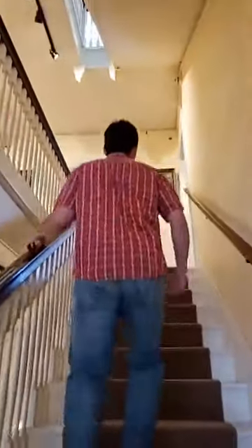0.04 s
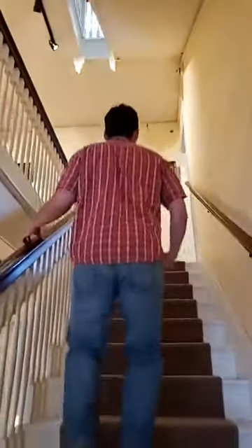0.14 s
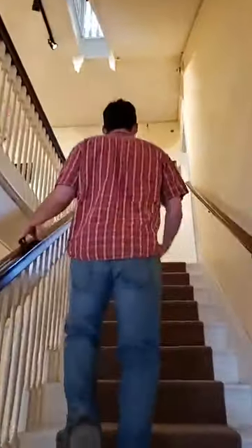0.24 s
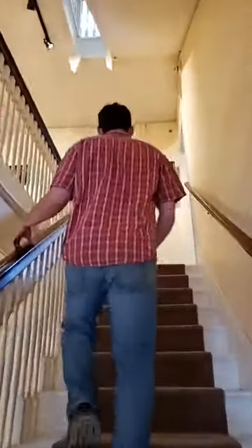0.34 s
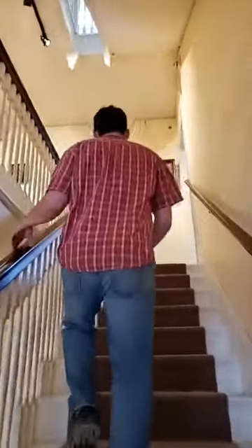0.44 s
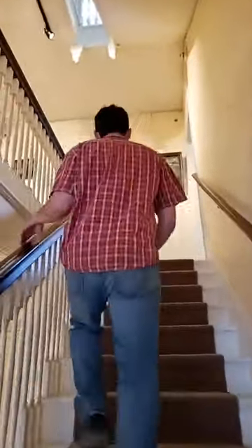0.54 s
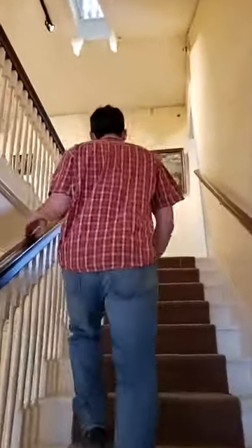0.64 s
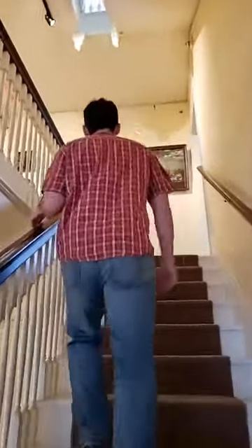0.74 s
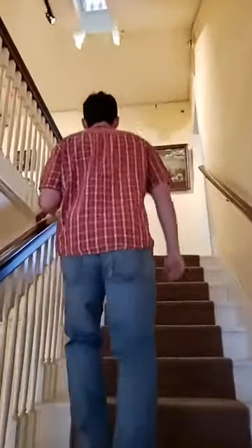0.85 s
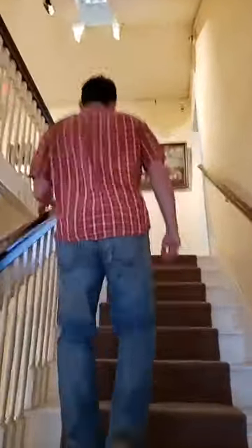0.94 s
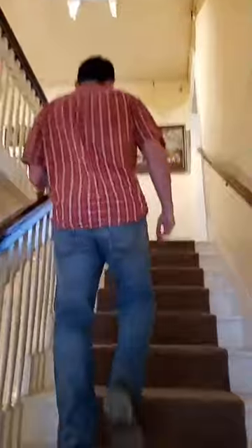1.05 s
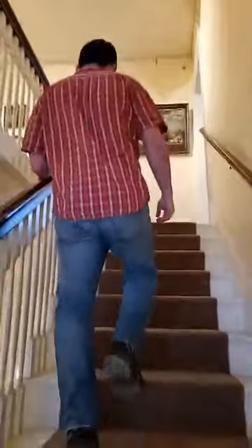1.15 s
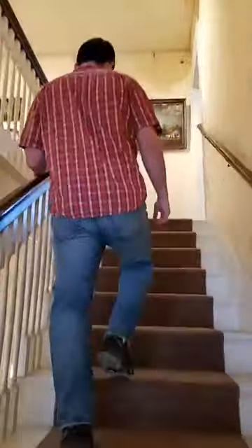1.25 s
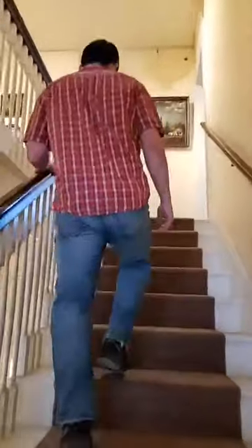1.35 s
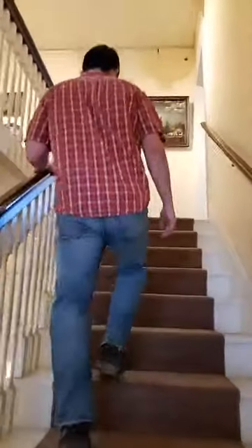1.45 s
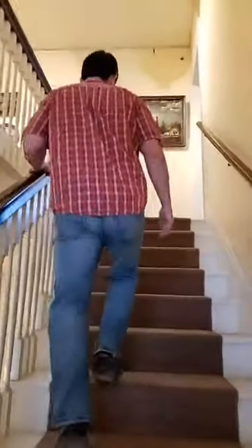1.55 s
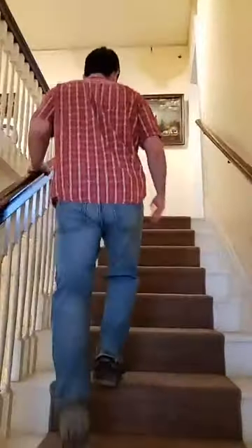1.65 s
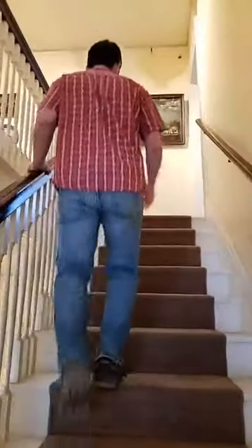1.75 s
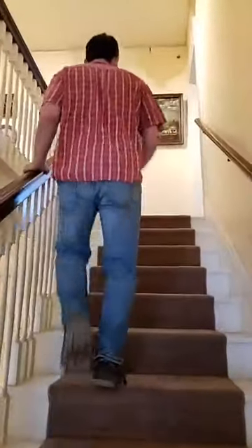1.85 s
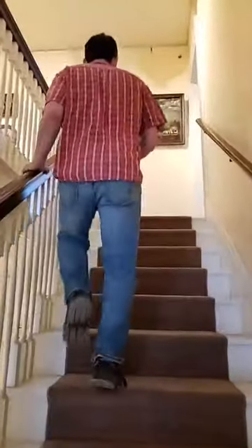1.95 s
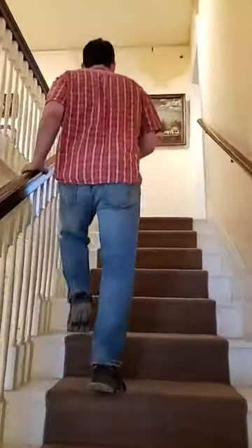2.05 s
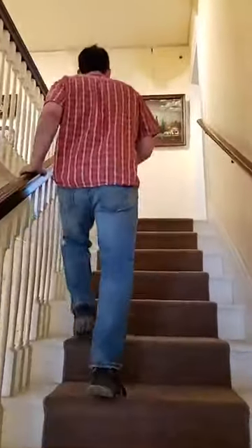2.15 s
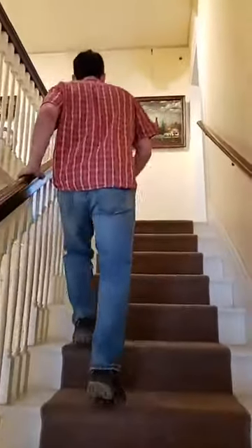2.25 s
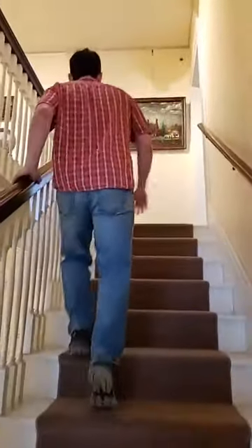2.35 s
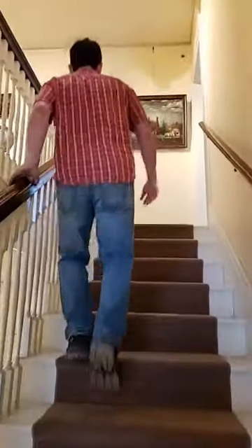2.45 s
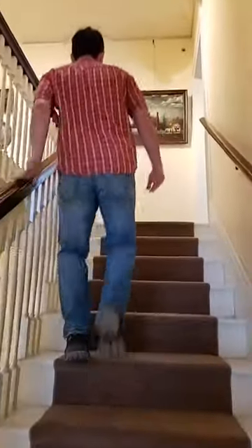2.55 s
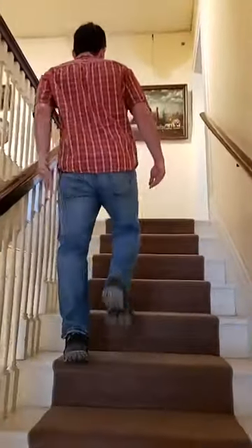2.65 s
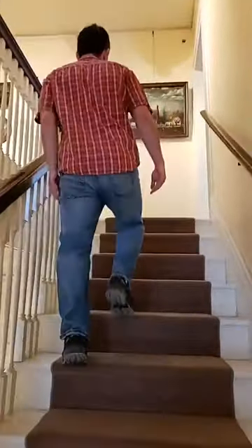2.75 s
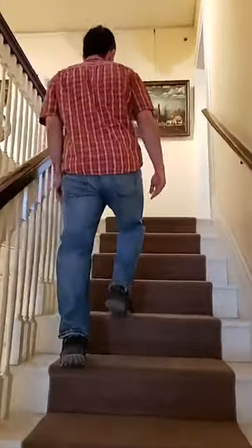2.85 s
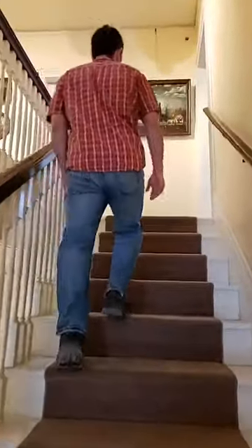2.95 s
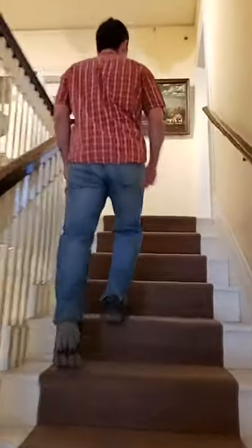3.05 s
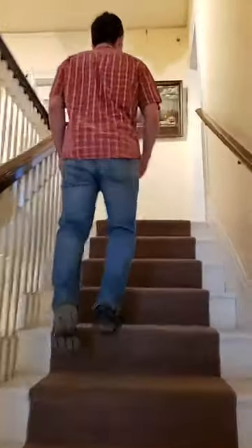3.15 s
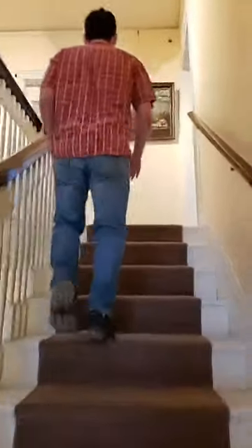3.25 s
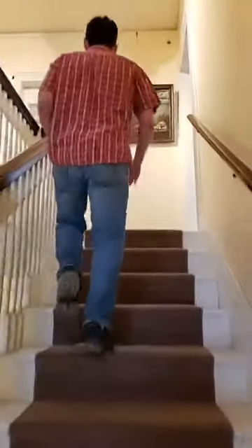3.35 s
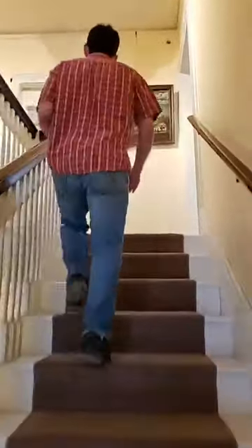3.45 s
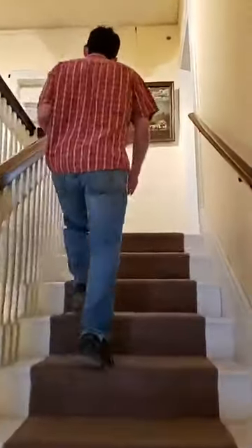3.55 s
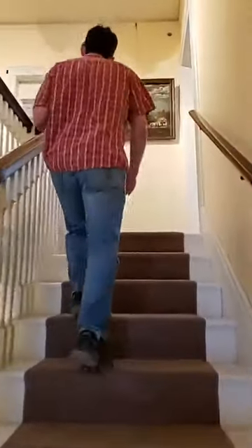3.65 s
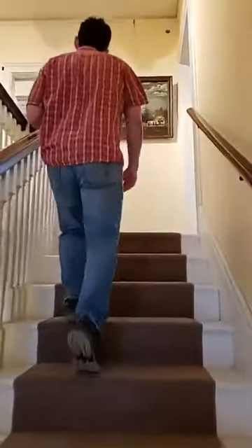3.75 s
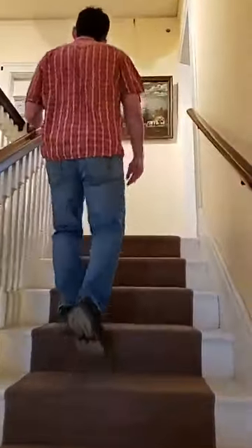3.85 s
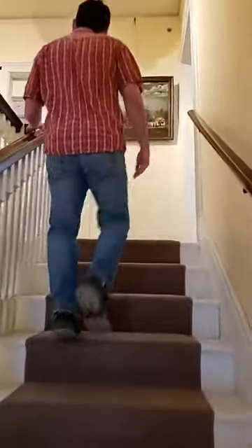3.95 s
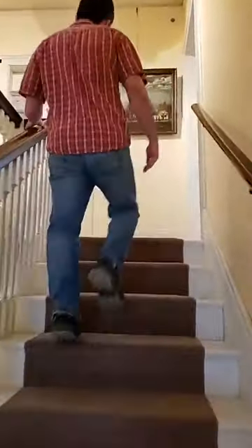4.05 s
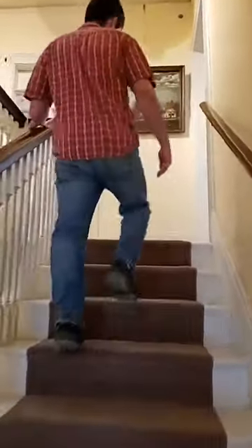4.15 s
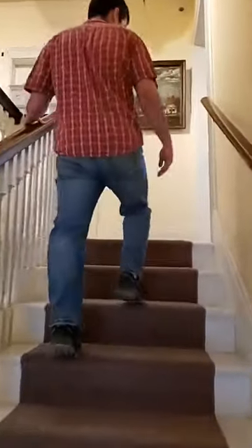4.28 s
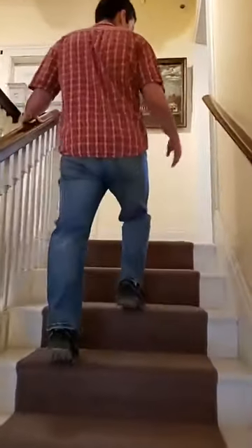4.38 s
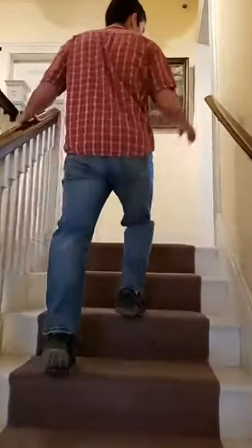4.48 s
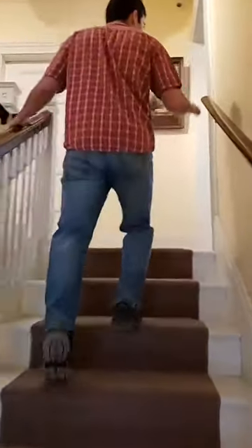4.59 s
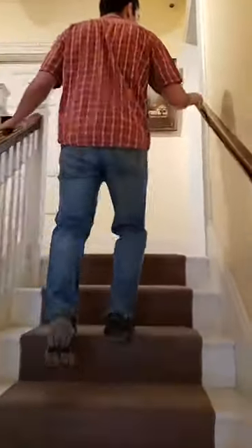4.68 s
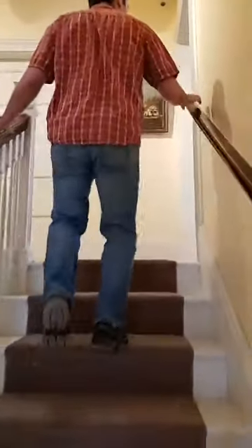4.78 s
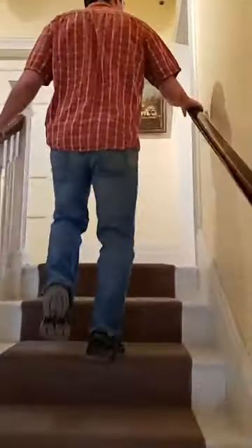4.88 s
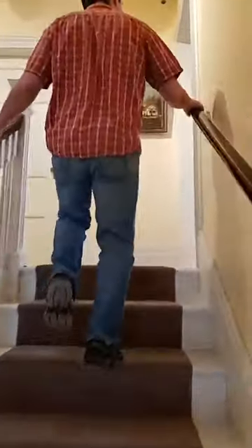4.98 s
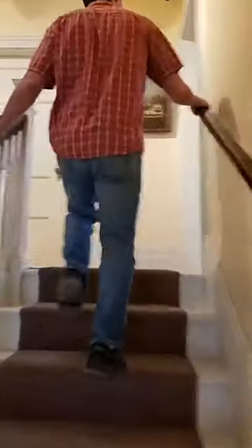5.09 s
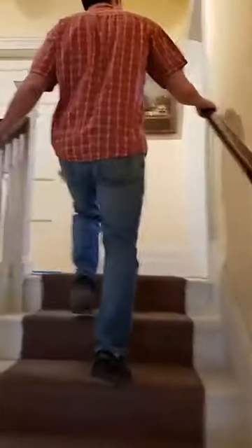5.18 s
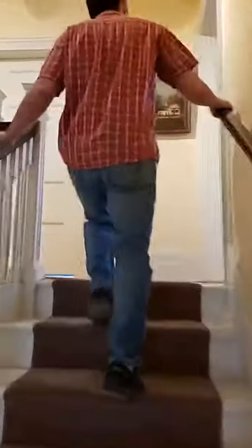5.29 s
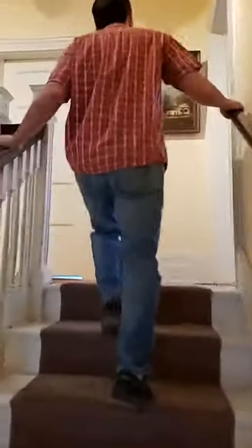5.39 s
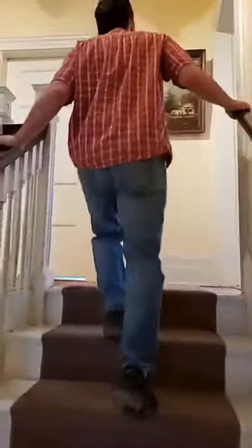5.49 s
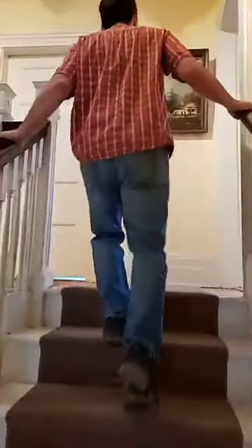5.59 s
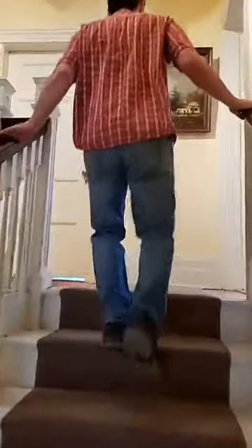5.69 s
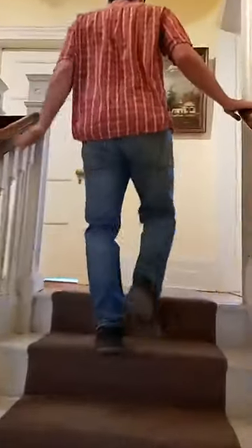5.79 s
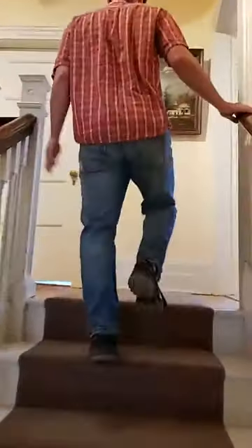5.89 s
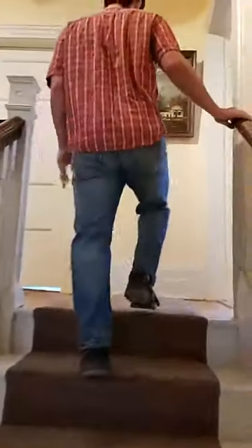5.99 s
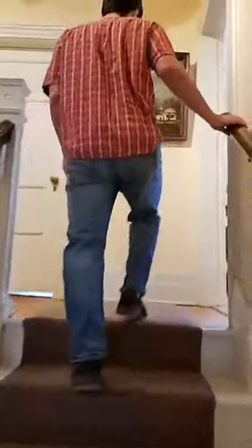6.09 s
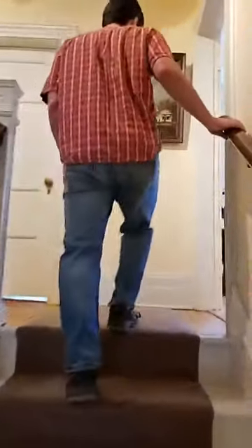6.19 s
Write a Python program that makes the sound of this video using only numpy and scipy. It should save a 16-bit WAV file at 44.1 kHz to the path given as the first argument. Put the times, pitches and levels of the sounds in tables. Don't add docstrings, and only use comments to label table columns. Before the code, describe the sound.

Unhurried shoes thud up hollow carpeted stairs, boards snapping and creaking underfoot, soles brushing the pile over a faint low house rumble.

```python
import sys
import numpy as np
from scipy import signal
from scipy.fft import rfft, irfft
from scipy.io import wavfile

SR = 44100
rng = np.random.default_rng(int(sys.argv[2]) if len(sys.argv) > 2 else 0)


def rack_gain(trim_db):
    fader = np.asarray(trim_db, float)
    return 10 ** (fader / 20)


def master(y):
    cut = np.clip(np.atleast_2d(y).T, -1, 1)
    pcm = np.round(cut * 32767)
    wavfile.write(sys.argv[1], SR, pcm.astype(np.int16))


N = 274566

# time in s, peak in dB, pitch of the stair in Hz, ring t60 in s.
THUDS = [(0.243, -36, 77, 0.16), (0.698, -44.5, 70.4, 0.19), (0.928, -31.5, 51.5, 0.47),
         (1.64, -22, 78.4, 0.049), (2.293, -31, 51, 0.21), (2.948, -38.5, 62.6, 0.25),
         (3.012, -26, 56, 0.15), (3.262, -63, 45, 0.22), (3.486, -36.5, 72, 0.17), (3.82, -33, 125, 0.23),
         (3.854, -19, 49.8, 0.36), (4.141, -37.5, 100, 0.25), (4.486, -22.5, 49.6, 0.28),
         (5.107, -20.5, 53.4, 0.32), (5.44, -44, 166, 0.23), (5.86, -36, 53.3, 0.39)]
# pitch in Hz, level in dB, t60 in s.
TREAD = [(173.5, -5, 0.086), (233.7, -11, 0.15), (315.3, -2, 0.17), (369.5, -1.5, 0.12), (459, -1, 0.095),
         (492, 0, 0.061), (623, -13, 0.04)]
# pitch in Hz, level in dB, t60 in s.
BOARD = [(849, -1, 0.039), (945, 2.5, 0.024), (1102, -12.5, 0.14), (1430, -0.5, 0.017)]


def rms_one(x):
    return x / np.sqrt(np.mean(x ** 2) + 1e-20)


def at_hz(points, hz):
    table_hz, values = np.transpose(points)
    return np.interp(np.log(hz), np.log(table_hz), values)


def drift(rate_hz):
    r = np.exp(-80 * np.pi * rate_hz / SR)
    settle = 2000
    noise = rng.standard_normal(N // 40 + settle + 2)
    slow = signal.lfilter([1], [1, -2 * r, r * r], noise)[settle:]
    return np.interp(np.arange(N) / 40, np.arange(len(slow)), rms_one(slow))


def coloured(x, spectrum):
    hz = np.maximum(np.arange(len(x) // 2 + 1) * SR / len(x), 1)
    return rms_one(irfft(rfft(x) * rack_gain(at_hz(spectrum, hz)), len(x)))


def ring(force, hz, t60):
    r = rack_gain(-60 / (t60 * SR))
    w = 2 * np.pi * hz / SR
    return signal.lfilter([0, np.sin(w)], [1, -2 * r * np.cos(w), r * r], force + 1e-18)


def body(force, modes):
    return sum((-1) ** k * rack_gain(db) * ring(force, hz, t60) for k, (hz, db, t60) in enumerate(modes))


def thuds():
    # pitch in Hz, level in dB, t60 in s.
    staircase_modes = [(42, -5, 0.23), (51.9, -0.5, 0.4), (79, -3.5, 0.33), (115.2, -3, 0.14),
                       (180, 1.5, 0.51)]
    out, pushes = np.zeros(N), np.zeros(N)
    for s, peak_db, hz, t60 in THUDS:
        i = round(s * SR)
        push = np.hanning(round(SR / hz * 0.52))
        force = np.zeros(min(SR, N - i))
        force[:len(push)] = rack_gain(peak_db) * push / push.sum()
        force = force - np.roll(force, len(push))
        pushes[i:i + SR] += force
        out[i:i + SR] += rack_gain(-2.0) * ring(force, hz, t60)
    return out + rack_gain(-6) * body(pushes, staircase_modes)


def swaying(t):
    rise_s, t60_s, rest_db = 0.051, 0.85, -62.5
    thud_s, thud_db = np.array(THUDS)[:, :1], np.array(THUDS)[:, 1:2]
    since = np.maximum(t - thud_s, 0)
    swing = rack_gain(thud_db - 17 - 60 * since / t60_s) * (1 - np.exp(-since / rise_s))
    return swing.sum(axis=0) + rack_gain(rest_db)


def slide_rows():
    # start, firmest moment and stop in s, firmest level in dB.
    pushed = [(0.048, 0.044, 0.13, -53), (0.686, 0.72, 0.8, -45.5), (0.776, 0.851, 0.88, -29),
              (0.884, 0.96, 1.09, -53.5), (1.631, 1.678, 1.772, -29), (1.69, 1.705, 1.732, -31),
              (2.272, 2.28, 2.29, -56), (2.331, 2.348, 2.477, -34), (3.005, 3.05, 3.17, -42),
              (3.866, 3.868, 3.89, -41), (4.458, 4.52, 4.595, -53), (5.004, 5.042, 5.06, -58),
              (5.082, 5.11, 5.01, -52), (5.83, 5.85, 5.865, -53.5)]
    # start and stop in s, start and braked level in dB.
    skids = [
        (1.269, 1.31, -39.5, -52),
        (1.584, 1.643, -43.5, -43),
        (3.26, 3.37, -47, -42.5),
        (3.761, 3.855, -32.5, -48.5),
        (3.921, 4.055, -37.5, -44),
        (5.137, 5.223, -30.5, -47),
        (5.219, 5.342, -51, -48.5),
        (5.659, 5.757, -36, -51.5),
    ]
    # start and stop in s, level in dB.
    pads = [(1.285, 1.36, -61), (1.858, 1.901, -52), (1.944, 2.01, -57), (2.345, 2.396, -55),
            (3.16, 3.223, -92), (3.263, 3.35, -61.5), (3.691, 3.80, -56.5), (4.594, 4.687, -49.5),
            (5.444, 5.517, -62.5), (5.666, 5.757, -63.5), (6.076, 6.15, -47.5)]
    swell_db, brake_s, skid_drag_db = 7, 0.016, 7
    firm_load_db, drag_per_db, push_drag_top_db = -37, 0.45, 5
    pad_rise_s, pad_swell_db, pad_drag_db = 0.02, 1.5, 12
    rows = []
    for start, firmest, stop, db in pushed:
        drag_db = min(drag_per_db * (firm_load_db - db), push_drag_top_db)
        rows.append((start, firmest, stop, db - swell_db, db, drag_db))
    for start, stop, db, braked_db in skids:
        rows.append((start, start + brake_s, stop, db, braked_db, skid_drag_db))
    for start, stop, db in pads:
        rows.append((start, start + pad_rise_s, stop, db - pad_swell_db, db, pad_drag_db))
    return rows


def scuffs():
    # frequency in Hz, level in dB per Hz.
    rasp_spectrum = [(710, -9), (1200, -8.5), (1740, -5.5), (3390, -6), (6410, -13), (7570, -7),
                     (8000, -12), (10400, -73), (17600, -120)]
    # frequency in Hz, level in dB per Hz.
    drag_spectrum = [(120, -9), (200, -6), (320, -5), (600, -5), (1000, -5), (1500, -12), (2500, -43)]
    # frequency in Hz, level in dB per Hz.
    sway_spectrum = [(18, -49), (30, 27.5), (50, 22), (80, 15.5), (130, 18), (220, -26)]
    # pitch in Hz, level in dB, t60 in s.
    sole_blocks = [(2200, 4, 0.0076), (3210, -26, 0.14), (4470, 2, 0.025), (6250, 8, 0.0086),
                   (7700, 6.5, 0.023)]
    # time in s, level in dB.
    effort = [(0.0, -63.5), (0.43, -63.5), (0.6, -110), (1.1, -59), (1.6, -74), (1.85, -69), (2.2, -66.5),
              (2.43, -43), (2.74, -63), (3.16, -68.5), (3.33, -49), (3.75, -73.5), (3.92, -52.5),
              (4.4, -67.5), (4.7, -58), (5.06, -71), (5.3, -64.5), (6.23, -65)]
    judder_hz, judder_db = 214, 2.5

    t, pressure, pull = np.arange(N) / SR, np.zeros(N), np.zeros(N)
    for start, firmest, stop, start_db, firm_db, drag_db in slide_rows():
        firmest = np.clip(firmest, start + .004, stop - .004)
        times = [start - .003, start, firmest, stop, stop + .0032]
        slide = rack_gain(np.interp(t, times, [-110, start_db, firm_db, firm_db - 9.5, -110]))
        pressure += slide
        pull += slide * rack_gain(drag_db)
    rustle = rack_gain(np.interp(t, *np.transpose(effort)))

    heights = rack_gain(3.0 * np.minimum(rng.exponential(1, N), 5))
    flicks = rng.random(N) < 6000 / SR
    grains = heights * rng.choice([-1, 1], N) * flicks
    catching = rack_gain(1.82 * drift(47))
    rasp = coloured(rms_one(grains) + 0.82 * rng.standard_normal(N), rasp_spectrum[:-2])
    singing = rms_one(sum(rack_gain(db + 3.6 * drift(4.1)) * rms_one(ring(rasp, hz, t60))
                          for hz, db, t60 in sole_blocks))
    cycles = judder_hz * np.cumsum(catching / catching.mean()) / SR
    judder = rack_gain(judder_db * np.cos(2 * np.pi * cycles))
    on_pile = catching * ((pressure + rustle) * rasp + rack_gain(-14) * pressure * singing) * judder

    drag = coloured(rng.standard_normal(N), drag_spectrum)
    shaking = catching * (pull + rack_gain(2.0) * rustle) * drag
    wood = rack_gain(-45.5) * body(shaking, TREAD) + rack_gain(-46.5) * body(shaking, BOARD)
    sway = swaying(t) * coloured(rng.standard_normal(N), sway_spectrum)
    return on_pile + rack_gain(-2.5) * shaking + wood + sway


def crack_rows():
    # time in s, peak in dB, board knock in dB relative, splinter pitch in Hz.
    board_cracks = [(0.0497, -36.5, 3.5, 3080), (0.1073, -37, 4.5, 1590), (0.835, -14.5, -3.5, 3400),
                    (1.257, -19.5, -0.5, 4950), (1.2765, -23, -3, 4860), (1.5864, -18, -0.5, 6500),
                    (1.7609, -23, 0.5, 1850), (1.8441, -20.5, -2, 4300), (1.939, -24.5, 3, 2880),
                    (2.337, -23.5, -7, 2100), (2.352, -16, -0.5, 2200), (2.4722, -24.5, -10, 1810),
                    (3.046, -19.5, -1.5, 3680), (3.259, -41.5, 7, 2400), (3.2765, -36, 10, 1710),
                    (3.3298, -33, -0.5, 1680), (3.7362, -23.5, 3.5, 4600), (4.507, -29, -3, 4280),
                    (4.6195, -35.5, 10, 1850), (5.1357, -17, -10.5, 3570), (5.449, -33.5, -2, 1600),
                    (5.6003, -23.5, 3, 3330)]
    # time in s, peak in dB, tread body in dB relative.
    tread_cracks = [(0.9822, -34.5, 4), (0.993, -29, -17), (1.603, -22.5, -1), (1.874, -34, 4.5),
                    (2.313, -26.5, -9), (2.322, -27.5, -11), (3.021, -33, -10), (3.0385, -24, -2),
                    (3.0836, -25.5, -4.5), (3.1024, -27, -2.5), (3.1955, -39, 11), (3.7158, -25, -7),
                    (3.7631, -22, -4.5), (3.9182, -34.5, 8.5), (3.9847, -34.5, 9), (4.522, -41, 3),
                    (4.562, -35, 6), (4.6027, -28.5, 3), (5.216, -28.5, 2), (5.6597, -21.5, -6),
                    (6.0765, -30, -3), (6.101, -29, -9)]
    # time in s, peak in dB, splinter pitch in Hz.
    ticks = [(0.8747, -23.5, 4400), (0.9515, -28, 3140), (1.5754, -40, 3730), (2.115, -41, 3060),
             (2.1533, -40.5, 3700), (2.1982, -43, 1660), (2.2247, -42.5, 7500), (2.7347, -44, 1690),
             (2.9566, -42, 7700), (2.997, -44, 7490), (3.01, -42, 5570), (3.6857, -42, 1990),
             (0.7796, -31, 3500), (4.147, -45, 1660), (5.4836, -40, 3920), (5.5362, -42, 1760),
             (5.549, -37.5, 1850), (5.5687, -34.5, 7750), (5.8345, -41, 2820), (5.869, -39.5, 1910),
             (5.911, -40.5, 3550)]
    board_to_tread_db, tread_to_board_db, tick_tread_db = -10, -11, -10.5
    rows = [(s, db, board_db + board_to_tread_db, board_db, 4.22, hz) for s, db, board_db, hz in board_cracks]
    rows += [(s, db, tread_db, tread_db + tread_to_board_db, 3.57, 1850) for s, db, tread_db in tread_cracks]
    rows += [(s, db, tick_tread_db, -5, 3.6, hz) for s, db, hz in ticks]
    creak_s, gap_s, creak_db, step_db = 0.6852, 0.0084, -30.5, -0.2
    rows += [(creak_s + gap_s * k, creak_db - step_db * k, tick_tread_db, -2.5, 3.7, 1810) for k in range(8)]
    return rows


def cracks():
    span = 2000
    snap, low, knock = np.zeros((3, N + span))
    t = np.arange(span) / SR
    for s, peak_db, tread_db, board_db, slip_ms, splinter_hz in crack_rows():
        slips = rng.standard_normal(span) * rack_gain(3.0 * rng.standard_normal(span))
        burst = slips * np.minimum(t / 0.0002, 1) * np.exp(-(t / (slip_ms / 1000)) ** 2)
        burst = rack_gain(peak_db + 9.5) * burst / np.abs(burst).max()
        hardest = np.abs(burst) ** 6
        jolts = hardest / np.sum(hardest) * rack_gain(peak_db)
        i = round(s * SR)
        spot = slice(i, i + span)
        snap[spot] += burst + rack_gain(-23) * ring(burst, splinter_hz, .008)
        low[spot] += jolts * rack_gain(tread_db)
        knock[spot] += jolts * rack_gain(board_db)
    bright = signal.sosfilt(signal.butter(2, 1300, "high", fs=SR, output="sos"), snap)
    out = rack_gain(-3.5) * bright + rack_gain(-2.5) * body(low, TREAD) + rack_gain(-1.5) * body(knock, BOARD)
    return out[:N]


def stairwell(x):
    # frequency in Hz, t60 in s.
    decay = [(60, 0.55), (300, 0.59), (1000, 0.52), (4000, 0.35), (12000, 0.17)]
    out, white = np.zeros(N), rng.standard_normal((2, N))
    late = round(.004 * SR)
    fill = np.exp(-1 / (.005 * SR))
    edges_hz = 35 * 2 ** np.arange(0, 9.2, .4)
    for k, (low, high) in enumerate(zip(edges_hz, edges_hz[1:])):
        band = signal.butter(2, [low, high], "band", fs=SR, output="sos")
        t60 = at_hz(decay, np.sqrt(low * high))
        keep = rack_gain(-120 / (t60 * SR))
        power = signal.sosfilt(band, x) ** 2
        energy = signal.lfilter([(1 - keep) * (1 - fill)], np.convolve([1, -keep], [1, -fill]), power)
        field = np.sqrt(np.abs(energy)) * rms_one(signal.sosfilt(band, white[k % 2]))
        out[late:] += field[:N - late]
    return out


def house_rumble():
    # frequency in Hz, level in dB per Hz.
    rumble_spectrum = [(15, -59), (25, 8), (79, 3), (271, -7), (394, -8), (605, -17), (929, -22),
                       (1400, -22.5), (2130, -31.5), (5740, -28.5), (9000, -26.5), (16000, -25.5)]
    return rack_gain(-50.5 + 1.8 * drift(1.4)) * coloured(rng.standard_normal(N), rumble_spectrum)


def scene():
    snaps = cracks()
    feet = scuffs() + thuds()
    room = stairwell(rack_gain(-5.0) * snaps + rack_gain(-6.5) * feet)
    return (snaps + feet + room + house_rumble())[None]


def top_cut(x):
    return signal.sosfilt(signal.butter(12, 15200, fs=SR, output="sos"), x)


def record(dry):
    # frequency in Hz, width in Hz, gain in dB.
    port = [(7650, 290, 1.5), (8670, 810, -10.5), (9500, 850, -8), (10240, 2640, -7.5), (13000, 670, 1.5)]
    x = signal.sosfilt(signal.butter(2, 36, "high", fs=SR, output="sos"), dry)
    for hz, width_hz, db in port:
        w, gain = 2 * np.pi * hz / SR, rack_gain(db / 2)
        alpha = np.sin(w) * width_hz / hz / 2
        zeros = [1 + alpha * gain, -2 * np.cos(w), 1 - alpha * gain]
        poles = [1 + alpha / gain, -2 * np.cos(w), 1 - alpha / gain]
        x = signal.lfilter(zeros, poles, x)
    x = signal.sosfilt(signal.ellip(9, .5, 42, 13880, fs=SR, output="sos"), x)
    return top_cut(x)


dry = scene()
out = record(dry)
master(out)
```